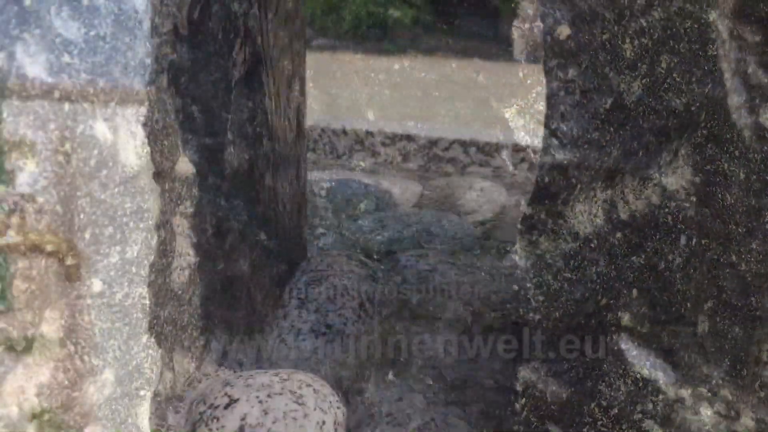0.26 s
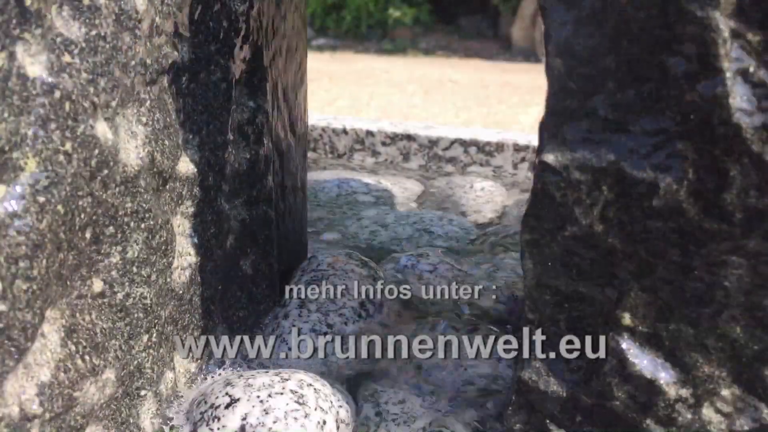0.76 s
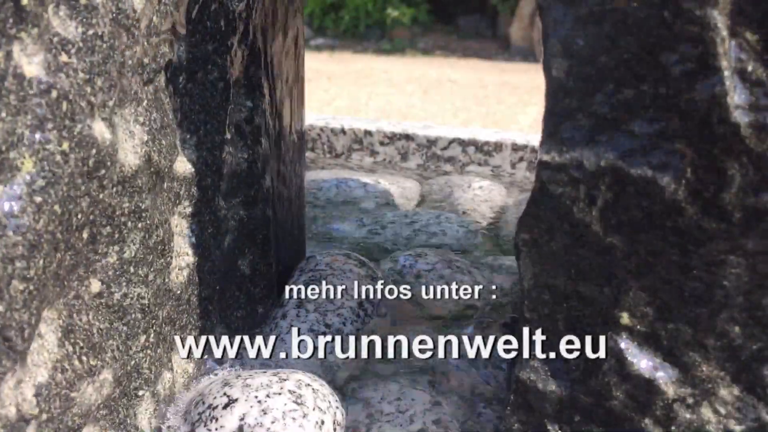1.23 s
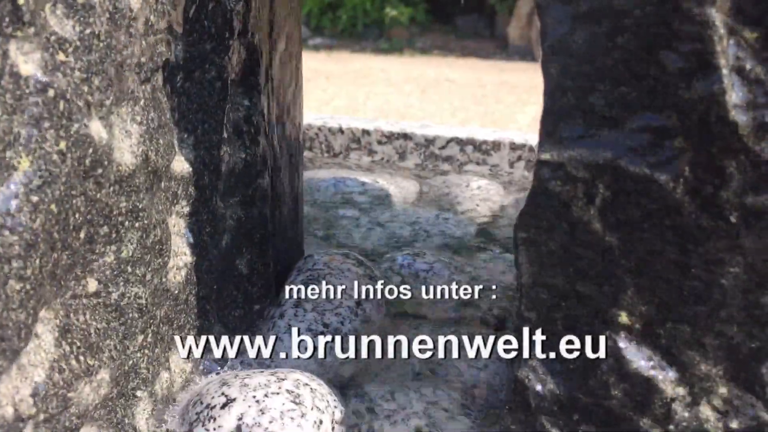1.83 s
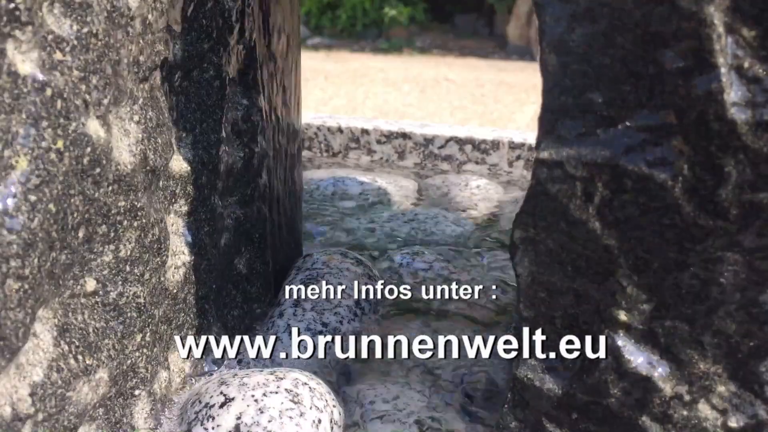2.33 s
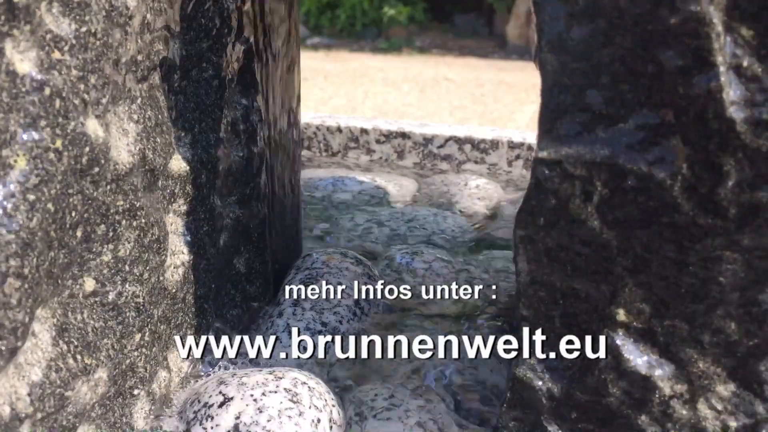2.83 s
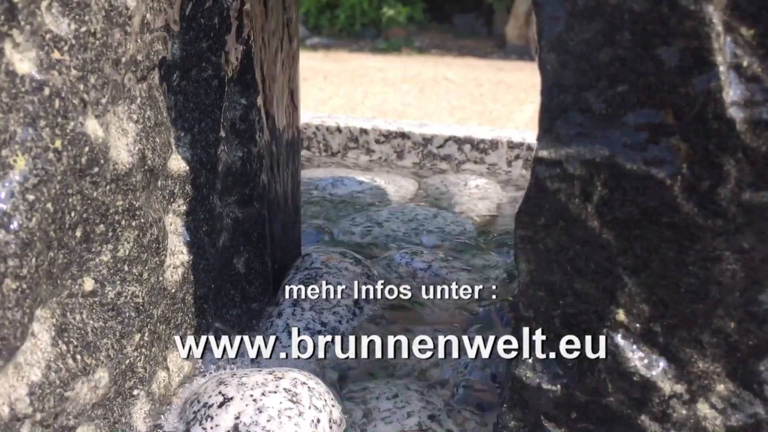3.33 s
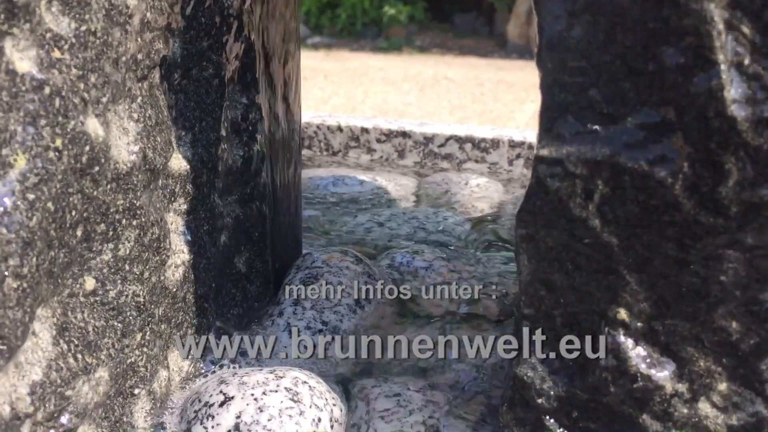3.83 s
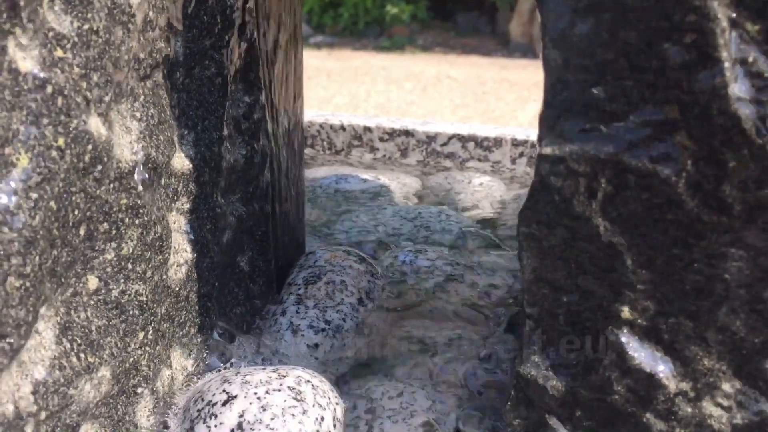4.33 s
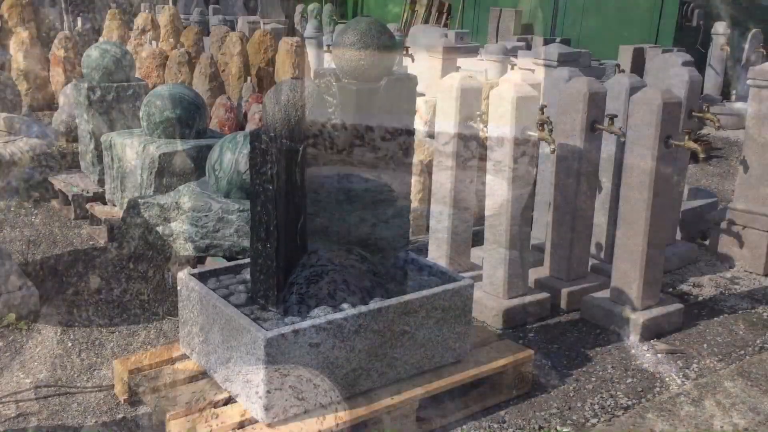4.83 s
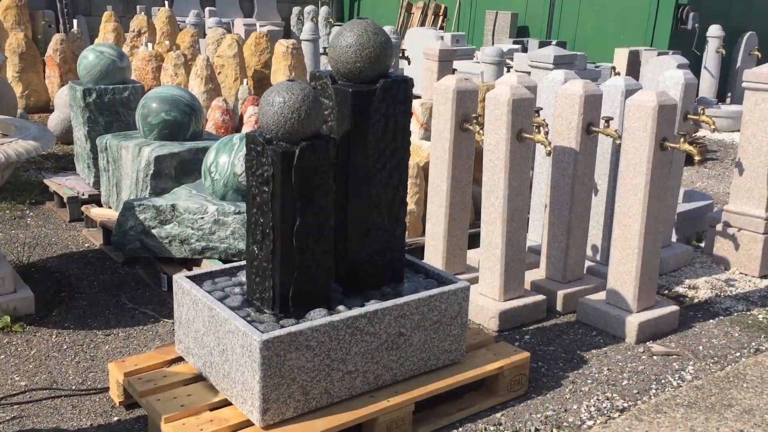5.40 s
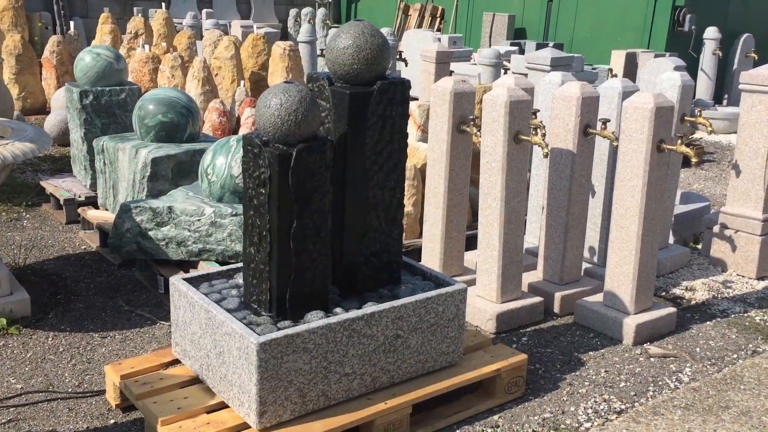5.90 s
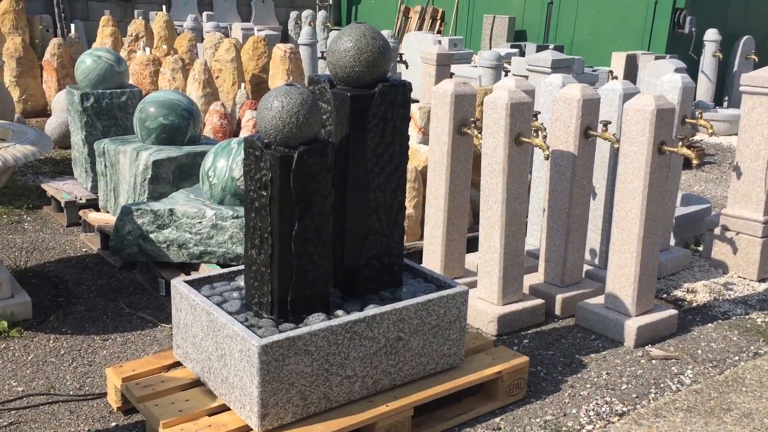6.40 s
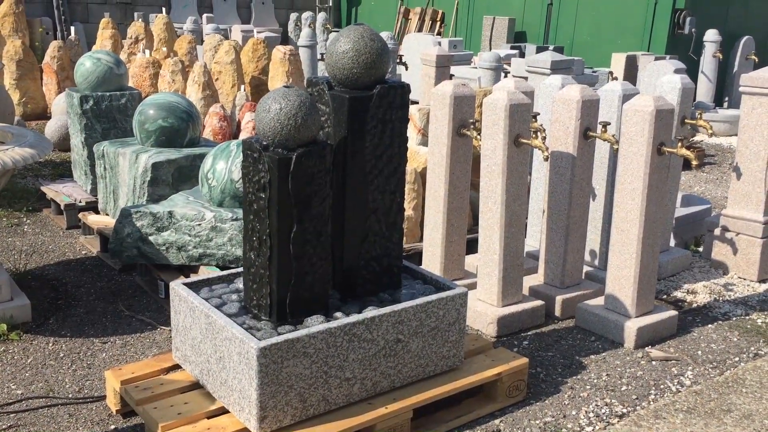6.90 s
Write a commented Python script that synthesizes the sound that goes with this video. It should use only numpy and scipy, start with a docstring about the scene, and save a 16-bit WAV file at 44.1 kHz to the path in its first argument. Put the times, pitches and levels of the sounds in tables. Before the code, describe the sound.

From 0 to about 4.5 seconds the microphone sits very close between a fountain's wet stone columns outdoors. Faint at first, then dense from 0.4 seconds, come tiny bright plinks, very short and glassy, at irregular intervals, with strong ones around 0.7, 1.0, 2.05, 2.4 and 3.6 seconds. Crisp spray ticks, small low slaps and brief rising gurgles fall among them, over a fine, thin patter of running water, low rumble and faint pump hum. Short stone reflections color everything. Between 4.4 and 5.1 seconds this blends to a position a few steps away: a steady soft trickle, diffuse splashing and hollow burbling, with a clear glug near 5.6, another around 5.9 and a longer, deeper plop near 6.3. Quiet outdoor rumble continues. From about 6.6 seconds a bright, wavering hiss swells over the water until the end.

```python
"""Bright plinks of trapped bubbles, slaps and ticks of spray, close up between a garden fountain's stone columns.
Then, from a few steps away, a soft trickle with hollow glugs over outdoor rumble; at the end a hiss swells.
Bubbles are decaying sines with a gliding pitch; drops and spray are noise bursts and clicks through resonances.
Wash, rumble and hiss are coloured noise, the pump's hum is four sines, and noise tails echo off the stone."""
import sys
import numpy as np
from scipy import signal
from scipy.fft import rfft, irfft
from scipy.io import wavfile
from scipy.ndimage import uniform_filter1d

SR = 44100
rng = np.random.default_rng(int(sys.argv[2]) if len(sys.argv) > 2 else 0)


def dump_mix(stems):
    """Bounce the given channels to the path in sys.argv[1] as a 16-bit WAV at rate SR."""
    frames = np.atleast_2d(stems).T  # one column per channel
    limited = np.clip(frames, -1, 1)  # hard clip at full scale
    pcm = np.round(limited * 32767).astype(np.int16)
    wavfile.write(sys.argv[1], SR, pcm)


N = 315315

# The clearest bubbles trapped between the pebbles.
# Each row: start in seconds, peak level in dB, pitch in Hz, decay in ms, relative snap of the falling drop in dB.
PLINKS = [(.112, -24.5, 1870, 2.7, -41), (.4124, -11.5, 3420, 0.7, -44), (0.5174, -10, 3600, 0.55, -37),
          (0.5981, -12, 3170, 0.84, -51), (.676, -17.5, 3670, .4, -39), (0.7192, -5.5, 2630, 0.71, -38),
          (.9079, -25, 3500, 1.1, -28), (0.9215, -10.5, 3800, 0.62, -30.5), (.957, -8, 3040, 0.26, -30),
          (1.0132, -7, 2400, 0.46, -29), (1.0167, -10.5, 3250, .7, -30), (1.0316, -18, 3560, 1.7, -27.5),
          (1.0953, -8.5, 3610, 1.4, -23.5), (1.134, -18, 3390, 1.7, -30), (1.174, -22.5, 4300, 1.2, -42),
          (1.2037, -15.5, 3020, 1.7, -28), (1.2821, -15.5, 3720, 0.58, -34), (1.3208, -18, 3200, 0.87, -39),
          (1.4167, -8, 2590, 1.1, -21), (1.4433, -6.5, 3770, 0.65, -26), (1.4729, -15.5, 3520, 0.72, -27),
          (1.6341, -19.5, 3450, 1.6, -27), (1.6971, -13.5, 2300, 0.66, -50), (1.708, -10.5, 2890, .8, -31),
          (1.816, -23, 2690, 2, -37), (1.8298, -18, 2850, 0.98, -43), (1.8676, -18, 3640, 2.6, -36),
          (1.9737, -8.5, 3660, .6, -26.5), (1.9952, -20.5, 3300, 1.4, -44), (2.049, -5, 3250, 1.5, -24.5),
          (2.0763, -10, 2880, 1.4, -48), (2.1048, -20.5, 2700, 2.1, -54), (2.142, -8.5, 2650, 0.84, -32),
          (2.198, -16, 3440, 0.93, -33), (2.3254, -10.5, 2660, 0.81, -51), (2.3874, -16, 2060, 1.5, -48),
          (2.4144, -3, 2500, 1.1, -21.5), (2.4604, -16, 3470, 0.45, -38), (2.535, -6.5, 2840, 0.43, -28),
          (2.542, -19, 2580, 2.5, -33), (2.6032, -27, 3050, 0.74, -26), (2.6244, -12.5, 3250, 0.99, -32),
          (2.8495, -7, 2475, 0.81, -23.5), (2.8624, -17, 3500, 1.3, -34), (2.8986, -10, 3130, 0.26, -31),
          (2.962, -19.5, 2110, 1.6, -40), (2.9786, -14.5, 3460, 1.3, -22.5),
          (3.1167, -6.5, 2740, 0.34, -49), (3.1446, -23, 3650, 1.1, -50), (3.2014, -11.5, 3280, 1.9, -29.5),
          (3.3049, -19.5, 2050, 1, -41), (3.3202, -21, 3554, 2.8, -26), (3.444, -21, 2290, 0.89, -56),
          (3.464, -11, 2580, 1.6, -38), (3.4764, -15.5, 3280, .8, -50), (3.52, -23.5, 2200, 0.97, -30.5),
          (3.5924, -6, 3440, 1.86, -42), (3.6495, -22.5, 3600, 1.4, -33), (3.7124, -18.5, 3100, .6, -30.5),
          (3.7454, -13, 3840, 1.45, -29), (3.8027, -11.5, 3210, 1.1, -24.5), (3.8534, -21, 3300, 1.1, -46),
          (3.8626, -16.5, 3850, .55, -38), (3.9035, -18.5, 2750, 1.15, -29), (3.934, -18.5, 2750, .4, -50),
          (4.0002, -14, 2320, .2, -27), (4.0559, -18, 2060, 1.3, -45), (4.076, -16.7, 3250, .9, -26),
          (4.0847, -15, 3800, .4, -22), (4.1654, -19, 3500, 0.58, -45), (4.2522, -18, 3400, .3, -36),
          (4.3216, -12.5, 2140, 0.55, -33), (4.327, -12, 2900, 0.53, -31.5), (4.3886, -18.5, 3230, .5, -51),
          (4.4189, -18.5, 3500, 1.1, -25.5), (4.451, -15, 3100, 0.39, -28), (4.499, -12, 2530, 1.8, -29),
          (4.5403, -11.5, 2130, .7, -50), (4.579, -8, 2590, 0.21, -38), (4.6943, -17.5, 2950, 0.59, -49),
          (4.7809, -19, 3230, 0.63, -38)]
# The listener's place.
# Each row: time in seconds, level of the close water in dB, level of the distant water in dB.
PLACE = [(0, -4.5, -30), (.5, 1, -13), (1, 0, -12.5), (4.35, 2, -18.5), (4.7, -3.5, -2), (5.1, -25.5, -1),
         (6.6, -22, -1), (7.15, -34, -0.5)]


def undb(db):
    """Decibels to gain."""
    return 10 ** (np.asarray(db) / 20)


def level(x, db):
    """Scale to an rms level in dB."""
    return x * undb(db) / np.sqrt(np.mean(x ** 2))


def curve(table):
    """Interpolate each column of a time table to one value a sample."""
    s, *columns = np.transpose(table)
    t = np.arange(N) / SR
    return [np.interp(t, s, column) for column in columns]


def colour(x, points):
    """Filter by a smooth spectrum, drawn through points of Hz and dB."""
    hz, db = np.transpose(points)
    f = np.maximum(np.fft.rfftfreq(len(x), 1 / SR), 1)
    gain = undb(np.interp(np.log(f), np.log(hz), db))
    return irfft(rfft(x) * gain, len(x))


def band(x, hz, width):
    """One resonance, gain 1 at its centre; both settings in Hz."""
    hz = min(hz, SR * .45)
    width = min(width, SR / 3)
    b, a = signal.iirpeak(hz, hz / width, fs=SR)
    return signal.lfilter(b, a, x)


def walk(rate):
    """Smooth random wandering with an rms of 1, aiming at a new value `rate` times a second."""
    k = max(int(SR / rate), 1)
    steps = np.repeat(rng.standard_normal(N // k + 1), k)[:N]
    return level(uniform_filter1d(steps, k), 0)


def add(track, s, sound):
    """Mix a sound in at a time in seconds."""
    i = int(np.clip(s * SR, 0, N - 1))
    track[i:i + len(sound)] += sound[:N - i]


def span(ms):
    """Time axis in ms, a few samples longer than asked."""
    return np.arange(int(ms * SR / 1000) + 8) * 1000 / SR


def bubble(hz, decay_ms, rise_cycles, glide):
    """A bubble pinches off over its rise, then rings out; a positive glide makes its pitch climb."""
    decay_ms = max(decay_ms, .2)
    ms = span(8 * decay_ms)
    pitch = hz * (1 + glide * np.tanh((ms / decay_ms - 1) / 2))
    cycles = np.cumsum(pitch) / SR
    rise = (1 - np.exp(-cycles / rise_cycles)) ** 2
    shape = rise * np.exp(-ms / decay_ms)
    return shape / shape.max() * np.sin(2 * np.pi * cycles)


def bubbles(table, rise_cycles, glide):
    """Play bubbles from rows of start in s, level in dB, pitch in Hz, decay in ms."""
    out = np.zeros(N)
    for s, db, hz, decay_ms in table:
        add(out, s, undb(db) * bubble(hz, decay_ms, rise_cycles, glide))
    return out


def swarm(count, hz, octaves, ring_cycles, scatter_db):
    """Bubble rows at random times, a few much louder than the rest, with pitches scattered around hz."""
    when, pitch, size, ring = rng.random((count, 4)).T
    db = -scatter_db * np.log(size + 0.041)
    hzs = hz * 2 ** (octaves * np.arcsin(2 * pitch - 1))
    decay_ms = 1000 * ring_cycles * (.5 + ring) / hzs
    return np.column_stack([when * N / SR, db, hzs, decay_ms])


def spray(count, scatter_db, tail_ms):
    """Countless tiny impacts, a few larger than the rest, each with a short noisy spatter."""
    when, size, sign = rng.random((count, 3)).T
    clicks = np.zeros(N)
    impacts = undb(-scatter_db * np.log(size + 0.0065)) * np.sign(sign - .5)
    np.add.at(clicks, (when * (N - 1)).astype(int), impacts)
    power = np.convolve(clicks ** 2, np.exp(-2 * span(13) / tail_ms))[:N]
    spatter = np.sqrt(power) * rng.standard_normal(N)
    return level(clicks, -9) + level(spatter, 0)


def burst(decay_ms, crack):
    """A sharp one-sample crack and a brief decaying spatter of noise."""
    ms = span(20)
    out = rng.standard_normal(len(ms)) * np.exp(-ms / decay_ms)
    out[0] += abs(crack)
    return out


def dripping(per_s, db, spread_db, hz, octaves):
    """Rows of s, dB, Hz for drops that let go at a loose, steady rate, each with its own size and pitch."""
    count = int(per_s * N / SR)
    when, size, pitch = rng.random((count, 3)).T
    s = (np.arange(count) + when) / per_s
    dbs = db + spread_db * (2 * size - 1)
    hzs = hz * 2 ** (octaves * (2 * pitch - 1))
    return np.column_stack([s, dbs, hzs])


def close_drops(rows):
    """Set drops to the level of the close water, so they fade as the listener steps away."""
    s, near_db, _ = np.transpose(PLACE)
    return [(at, db + np.interp(at, s, near_db), hz) for at, db, hz in rows]


def stone_gap(x):
    """The gap between the columns passes a little of everything and rings briefly at its resonances."""
    # Each row: resonance in Hz, least width in Hz, gain in dB.
    gap = [(2036, 87, 17.5), (3500, 120, 22.5), (5216, 380, 11), (5980, 184, 8.5), (6970, 84, -5),
           (8140, 100, 3.5), (8960, 100, 0), (9700, 340, -3), (10540, 390, -17.5), (11020, 690, -3),
           (12070, 360, 1)]
    out = .2 * band(x, 8000, 9000)
    for hz, width, db in gap:
        out += undb(db) * band(x, hz, max(width, hz / 26))
    return out


def echoes(x, decay_ms, db, count=8):
    """Scattered reflections from stone, building up in about a millisecond; each landing spot has its own."""
    ms = span(100)
    hold = SR // 40  # the water lands on another random spot every 25 ms
    spot = np.repeat(rng.integers(count, size=N // hold + 1), hold)[:N]
    out = np.zeros(N)
    for k in range(count):
        tail = rng.standard_normal(len(ms)) * np.exp(-ms / decay_ms) * (1 - np.exp(-ms ** 2))
        here = uniform_filter1d(1. * (spot == k), size=256)
        out += signal.oaconvolve(x * here, tail / np.linalg.norm(tail))[:N]
    return undb(db) * out


def plinks():
    """A drop snaps on the water and traps a bubble; those that ring longest pinch off most gently."""
    # fainter drops keep falling in between the clearest ones
    drips = close_drops(dripping(per_s=13, db=0, spread_db=2, hz=3250, octaves=0.36))
    drip_db, drip_ms, drip_snap_db = -25.5, 1.18, -41
    drops = PLINKS + [(s, drip_db + db, hz, drip_ms, drip_snap_db + db) for s, db, hz in drips]
    snaps, rings = np.zeros(N), np.zeros(N)
    for (s, db, hz, decay_ms, snap_db), softness in zip(drops, rng.random(len(drops))):
        add(snaps, s + .0005, undb(snap_db - 16) * burst(decay_ms=2.67, crack=2.5))
        add(rings, s - .0001, undb(db) * bubble(hz, decay_ms, rise_cycles=.85 * decay_ms, glide=.07))
        # a soft swell leads into each plink: a bubble played backwards
        swell = bubble(hz * .94, decay_ms=1.5, rise_cycles=.6, glide=-.08)[::-1]
        swell_gain = undb(db - 10 - 16 * softness) * min(decay_ms, 1) ** 2
        add(rings, s + .0005 - len(swell) / SR, swell_gain * swell)
    return rings + undb(10) * stone_gap(snaps) + undb(14.5) * band(snaps, 1060, 1100)


def daughters():
    """Each of the clearest trapped bubbles sheds a fainter one that rings a moment later."""
    lag_s, drop_db, middle_hz, decay_ms = .013, -18.5, 3450, 1.16
    chance = 2 * rng.random((len(PLINKS), 2)) - 1
    rows = []
    for (s, db, *_), (late, pitch) in zip(PLINKS, chance):
        at = s + lag_s * (1 + 0.23 * late)
        rows.append((at, db + drop_db, middle_hz * 2 ** (.18 * pitch), decay_ms))
    return bubbles(rows, rise_cycles=0.68, glide=.07)


def ticks():
    """Drops burst on wet stone close by, each a crack with its own brightness."""
    # The sharpest drops. Each row: start in seconds, relative level in dB, brightest frequency in Hz.
    sharp_ticks = [(.23, -21.5, 7800), (0.4126, -28.5, 7060), (.6281, -24.5, 5800), (0.85, -26.5, 7140),
                   (1.2814, -24.5, 8060), (1.4727, -26.5, 9700), (1.527, -27.3, 6460), (1.6311, -28, 7600),
                   (1.7579, -20.5, 8300), (2.08, -14.5, 6140), (2.167, -24.5, 6900), (2.3425, -21.5, 5730),
                   (2.5522, -15, 9900), (2.9, -19.5, 7040), (3.0858, -29, 5600), (3.116, -15.5, 11100),
                   (3.239, -27.5, 8000), (3.256, -31, 9300), (3.514, -25.5, 5870), (3.5756, -28.5, 10400),
                   (4.0824, -27, 10300), (4.511, -25.5, 7400), (4.5776, -25.5, 5860), (5.0376, -27.5, 6400),
                   (5.1518, -32, 9500), (5.1837, -32, 8000), (5.8837, -32.5, 6350)]
    # stray spray ticks faintly in between
    strays = close_drops(dripping(per_s=3, db=-33.5, spread_db=0, hz=9500, octaves=0.3))
    out = np.zeros(N)
    for s, db, hz in sharp_ticks + strays:
        crack = burst(decay_ms=1.9, crack=7.2)
        bright = band(crack, hz, 4000)
        ringing = stone_gap(bright + 0.054 * crack)
        body = band(crack, 1200, 1800)
        tick = 0.44 * bright + 2 * ringing + 0.56 * body
        add(out, s, level(tick, db - 12.0))
    return out


def gurgles(bubbles_per_s=330):
    """As an air pocket fills, it sheds smaller and smaller bubbles: a wet chirrup rising in pitch."""
    # Air pockets between the pebbles. Each row: start in seconds, length in seconds, loudest bubble in dB.
    pockets = [(0.101, 0.055, -28), (0.568, 0.052, -29), (.708, 0.042, -25), (0.873, 0.062, -31),
               (1.01, .045, -23), (1.413, 0.038, -25), (1.664, 0.084, -30), (1.808, 0.043, -26.5),
               (2.13, 0.048, -34), (2.392, 0.038, -44), (2.53, 0.023, -26), (2.583, 0.057, -27.5),
               (2.842, 0.021, -30), (2.938, 0.039, -46), (3.161, 0.072, -36), (3.292, 0.061, -31),
               (3.44, 0.056, -25), (3.875, 0.071, -29), (4.045, 0.048, -26.5), (4.317, 0.026, -34),
               (4.489, 0.031, -23), (4.55, 0.097, -32)]
    rows = []
    for s, length, db in pockets:
        chance = rng.random((64, 3))[:max(int(length * bubbles_per_s), 1)]
        for k, (when, pitch, size) in enumerate(chance):
            filled = (k + when) / len(chance)
            hz = 1950 * 2 ** (filled ** 0.85 + .4 * (pitch - .5))
            rows.append((s + filled * length, db - 9 * size, hz, 1.3))
    return bubbles(rows, rise_cycles=1.1, glide=.11)


def slaps():
    """A larger blob thumps into the water, its dent closing quickly, and throws up a rough spatter."""
    # Each row: start in seconds, relative level in dB, pitch in Hz.
    blobs = [(.6759, -24.5, 690), (.719, -22.5, 694), (1.0132, -28, 710), (1.8172, -31, 745),
             (2.1405, -18.5, 775), (2.197, -28.5, 656), (2.3251, -22, 780), (2.3418, -23, 980),
             (2.413, -28.5, 905), (2.593, -22.5, 740), (2.8487, -29, 940), (2.9611, -21, 665),
             (3.1164, -24, 820), (3.1637, -23, 930), (3.191, -30.5, 680), (4.0311, -28.5, 690),
             (4.0569, -22.5, 940), (4.5, -23, 810), (4.5783, -25, 930)]
    thumps, spatter = np.zeros(N), np.zeros(N)
    for s, db, hz in blobs:
        add(thumps, s, undb(db) * bubble(hz, decay_ms=2.2, rise_cycles=0.1, glide=0.54))
        spatter_hz = 1.04 * hz
        puff = band(burst(decay_ms=3.6, crack=3.5), spatter_hz, 900)
        puff = band(puff, spatter_hz, 1170)
        add(spatter, s, level(puff, db - 13.5))
    return undb(-5.5) * thumps + spatter


def close_water():
    """The fine patter between the columns: small bubbles, spray and the film running down the stone."""
    # The flow surges and slackens. Each row: time in seconds, relative level in dB.
    flow = [(0, -31.5), (.35, -40), (1.7, -38), (2.14, -40), (2.55, -41), (2.93, -40.5), (3.4, -39.7),
            (3.8, -43), (4.12, -40.5), (4.6, -39.5), (4.9, -45)]
    # Colour of the running film. Each row: frequency in Hz, relative level in dB.
    near_wash = [(350, -15), (520, -7.5), (950, -3.5), (1500, -7.5), (2900, -4), (3600, -25), (4150, -3),
                 (4700, -22), (5300, -20), (6100, -33), (7000, -19.5), (12700, -49), (16000, -47)]
    flow_db, = curve(flow)
    surge_db = flow_db - flow_db.mean()
    # bubbles come in clusters, spray in brief showers
    clusters = undb(2.8 * walk(18))
    showers = undb(2.6 * walk(13))
    patter = bubbles(swarm(count=800, hz=3250, octaves=.27, ring_cycles=4.5, scatter_db=3),
                     rise_cycles=1.3, glide=.06)
    burble = bubbles(swarm(count=650, hz=1150, octaves=.85, ring_cycles=3.8, scatter_db=2.6),
                     rise_cycles=.9, glide=.12)
    pips = bubbles(swarm(count=700, hz=5800, octaves=.45, ring_cycles=3, scatter_db=4),
                   rise_cycles=1.2, glide=.03)
    fizz = bubbles(swarm(count=1100, hz=10500, octaves=.45, ring_cycles=2.5, scatter_db=4),
                   rise_cycles=1.2, glide=.03)
    mist = stone_gap(band(spray(count=1300, scatter_db=3.5, tail_ms=2.4), 7300, 10500))
    film = colour(spray(count=3500, scatter_db=3, tail_ms=3), near_wash)
    running = (level(patter, -51.5) + level(film, -49.5)) * clusters
    flying = level(stone_gap(pips), -55.5) + level(stone_gap(fizz), -62.5) + level(mist, -58.5)
    flying = flying * showers
    # the low burble follows the surges least
    return (running + flying) * undb(0.86 * surge_db) + level(burble, -53) * undb(0.17 * surge_db)


def glugs():
    """Big bubbles gulp in the basin, deep ones longest; churned water around each roughens its note."""
    # Big bubbles. Each row: start in seconds, relative level in dB, pitch in Hz.
    big_bubbles = [(5.106, -34, 510), (5.138, -37.5, 460), (5.212, -32, 1020), (5.271, -32.5, 587),
                   (5.343, -34.5, 417), (5.486, -37, 574), (5.592, -24.5, 550), (5.653, -35.5, 890),
                   (5.942, -27.5, 1045), (6.084, -36, 560), (6.328, -33, 436), (6.366, -36, 610),
                   (6.439, -30, 1180), (6.536, -33, 657), (6.92, -32, 500), (6.984, -34, 567)]
    # Two low plops, one long and deep, one short.
    # Each row: start in seconds, peak level in dB, pitch in Hz, decay in ms.
    low_plops = [(6.327, -33, 328, 31), (5.584, -30, 450, 6)]
    decay_cycles = 3.1
    churn = np.zeros(N)
    for s, db, hz in big_bubbles:
        rough = band(band(burst(decay_ms=9, crack=1.), hz, 500), hz, 700)
        add(churn, s - .003, level(rough, db - 15))
    rows = [(s, db, hz, 1000 * decay_cycles / hz) for s, db, hz in big_bubbles]
    gulps = bubbles(rows, rise_cycles=.9, glide=.2)
    plops = bubbles(low_plops, rise_cycles=.6, glide=.03)
    return undb(-1.5) * gulps + plops + churn


def splashes(far):
    """Further off, each splash is a soft puff of band-limited spatter."""
    # The strongest splashes. Each row: start in seconds, relative level in dB, brightest frequency in Hz.
    strong_splashes = [(4.839, -25.5, 3100), (5.0219, -23.5, 4300), (5.031, -26, 3070),
                       (5.068, -26.5, 2700), (5.195, -25, 2900), (5.558, -22.5, 2670), (5.779, -27.5, 3820),
                       (6.296, -23, 3500)]
    # softer ones come in a loose, even patter
    patter = dripping(per_s=9, db=-29, spread_db=2, hz=3100, octaves=0.29)
    strong, soft = np.zeros(N), np.zeros(N)
    for track, rows in (strong, strong_splashes), (soft, patter):
        for s, db, hz in rows:
            puff = band(burst(decay_ms=3, crack=2.0), hz, 1700)
            add(track, s, level(band(puff, hz, 2600), db - 15))
    return strong + far * soft


def distant_water():
    """The basin from a few steps away: an even trickle over soft hollow burbling, blurred by stone echoes."""
    # Colour of the spatter. Each row: frequency in Hz, relative level in dB.
    far_wash = [(210, -31), (350, -16), (514, 3.5), (730, -4.5), (990, 0), (1430, -4.5), (2130, -7.5),
                (2420, -4), (2940, -1.5), (5060, -13.5), (5940, -12), (14300, -34), (16000, -56)]
    trickle = bubbles(swarm(count=1500, hz=3100, octaves=.6, ring_cycles=5.5, scatter_db=2.8),
                      rise_cycles=1., glide=.08)
    fizz = bubbles(swarm(count=1100, hz=7800, octaves=.75, ring_cycles=4, scatter_db=3.8),
                   rise_cycles=.6, glide=.03)
    burble = bubbles(swarm(count=220, hz=530, octaves=.33, ring_cycles=4.2, scatter_db=2.3),
                     rise_cycles=.9, glide=.15)
    babble = bubbles(swarm(count=480, hz=1120, octaves=.42, ring_cycles=5, scatter_db=2.2),
                     rise_cycles=.9, glide=.15)
    spatter = colour(spray(count=5000, scatter_db=3.4, tail_ms=2.4), far_wash) * undb(1.1 * walk(35))
    water = level(trickle, -48.0) + level(fizz, -53) + level(burble, -52.5)
    water = water + level(babble, -57.5) + level(spatter, -47.0)
    return water + echoes(water, decay_ms=5.4, db=-2.5)


def surroundings(near, far):
    """The pump's hum is a few sines; low outdoor rumble is dark noise with its own colour at each place."""
    # Each row: pump tone in Hz, relative rms level close by in dB, relative rms level further off in dB.
    pump = [(49.2, -52, -51), (100, -60.5, -55), (144, -61, -111), (309, -72.5, -61.5)]
    # Rumble colours, close and distant. Each row: frequency in Hz, relative level in dB.
    near_rumble = [(25, -56), (40, 3), (72, 3.5), (110, -5), (160, -1.5), (240, -5.5), (350, -8),
                   (550, -22.5), (1200, -34)]
    far_rumble = [(25, -20), (45, 0), (70, 6), (105, 0), (150, -5.5), (260, -11), (500, -16), (1200, -28.5)]
    t = np.arange(N) / SR
    hum = np.zeros(N)
    for hz, near_db, far_db in pump:
        rms = near * undb(near_db) + far * undb(far_db)
        hum += np.sqrt(2) * rms * np.sin(2 * np.pi * hz * t)
    sway = undb(.7 * walk(7))
    flutter = undb(2 * walk(14))
    close = level(colour(rng.standard_normal(N), near_rumble), -43.5)
    distant = level(colour(rng.standard_normal(N), far_rumble), -49.0)
    return (hum + np.sqrt(near) * close) * sway + far * distant * flutter


def hiss():
    """A bright hiss of coloured noise swells, its level wavering slightly."""
    # Each row: time in seconds, level in dB around which the hiss wavers.
    swell = [(0, -100), (6.5, -73), (6.7, -49), (6.86, -39.5), (7.15, -37)]
    # Each row: frequency in Hz, relative level in dB.
    hiss_colour = [(500, -37), (1000, -1), (2000, -1.5), (3200, 3), (4900, -3.5), (6000, 3), (8700, -2),
                   (9600, -7), (10700, -20), (16000, -38)]
    noise = level(colour(rng.standard_normal(N), hiss_colour), 0)
    return noise * undb(curve(swell)[0] + 0.55 * walk(33))


def scene():
    """Single drops and the steady flow, among stone faces."""
    near, far = undb(curve(PLACE))
    drops = plinks() + daughters() + ticks() + gurgles() + slaps()
    drops = drops + echoes(drops, decay_ms=3.1, db=-9.5)
    basin = glugs() + splashes(far)
    basin = basin + echoes(basin, decay_ms=12.5, db=-6.0)
    flow = near * close_water() + far * distant_water()
    return (drops + basin + flow + surroundings(near, far) + hiss())[None]


def record(dry):
    """The top is cut steeply above 16 kHz."""
    steep_cut = signal.ellip(8, .2, 70, 16000, fs=SR, output="sos")
    return signal.sosfilt(steep_cut, dry)


dry = scene()
out = record(dry)
dump_mix(out)
```